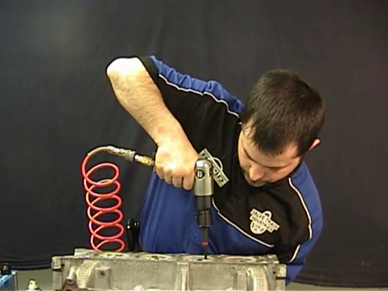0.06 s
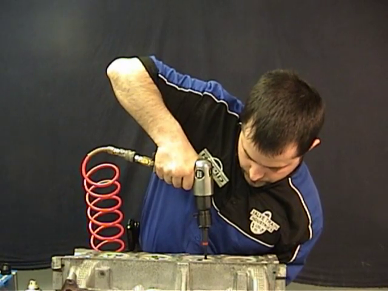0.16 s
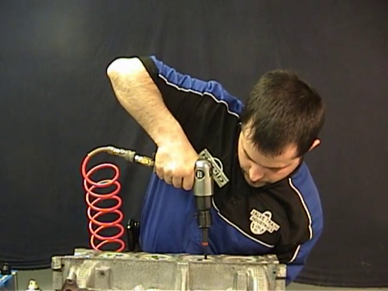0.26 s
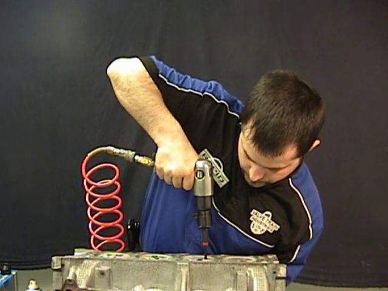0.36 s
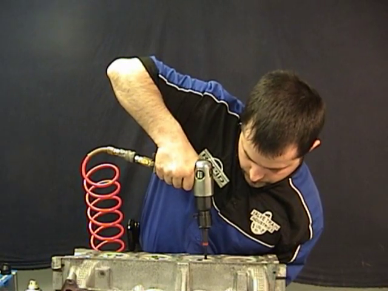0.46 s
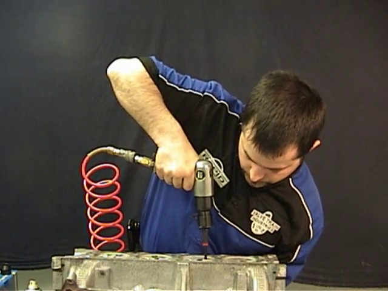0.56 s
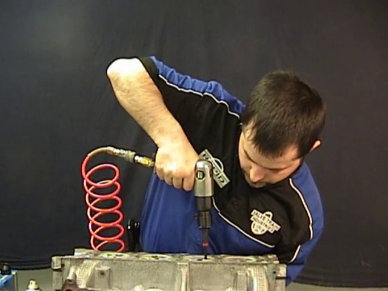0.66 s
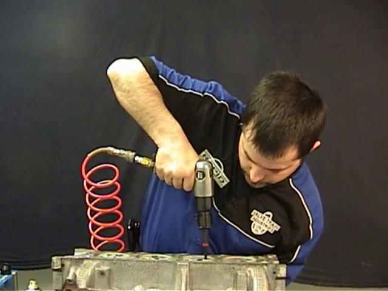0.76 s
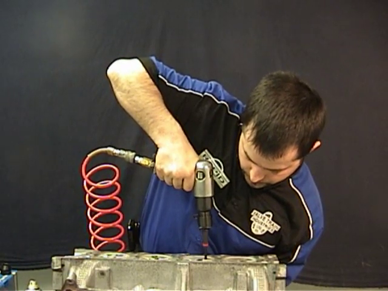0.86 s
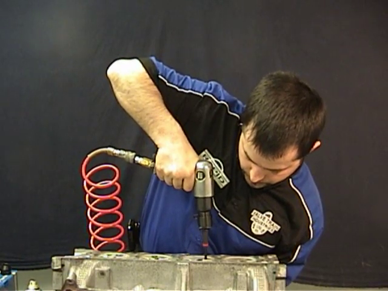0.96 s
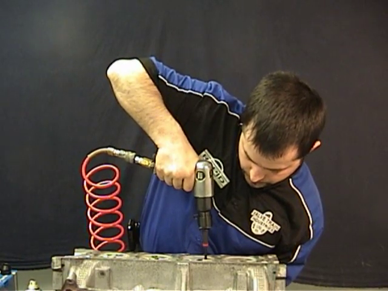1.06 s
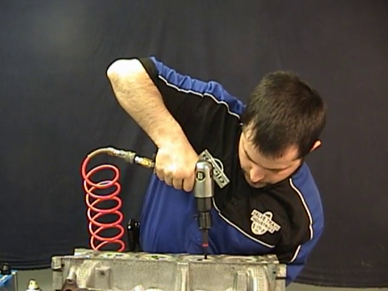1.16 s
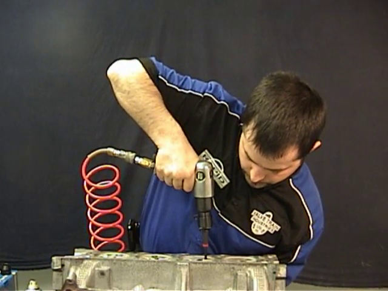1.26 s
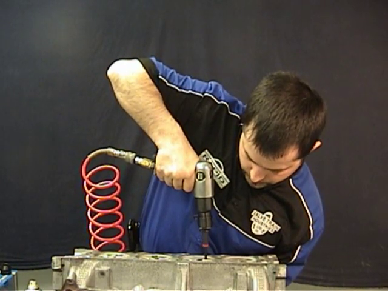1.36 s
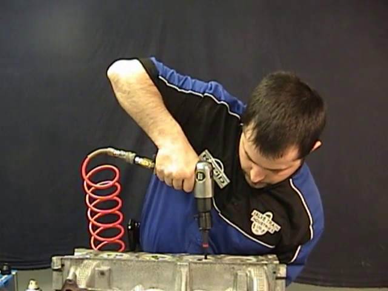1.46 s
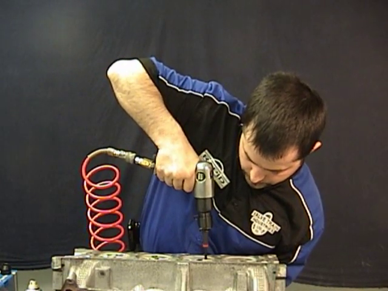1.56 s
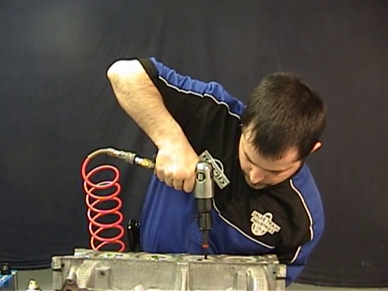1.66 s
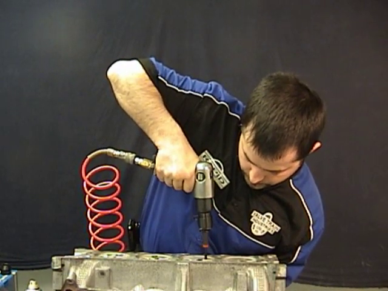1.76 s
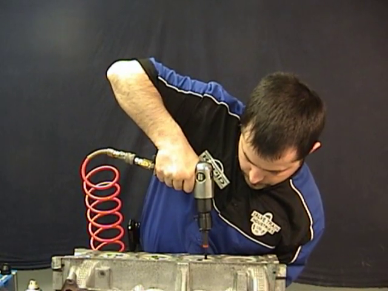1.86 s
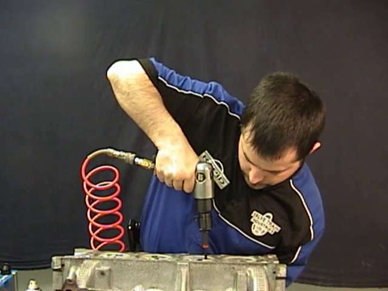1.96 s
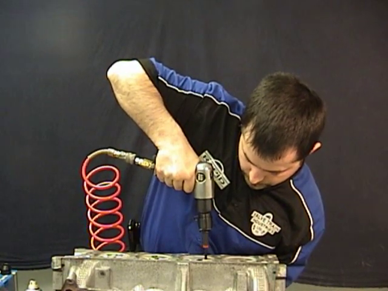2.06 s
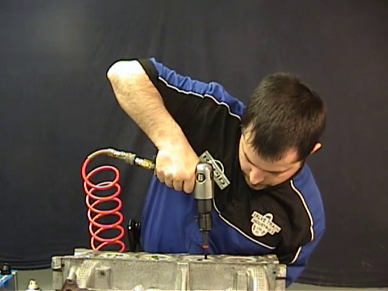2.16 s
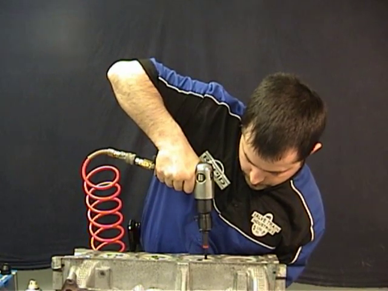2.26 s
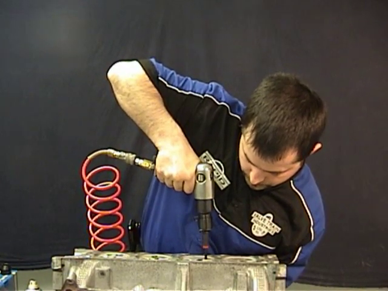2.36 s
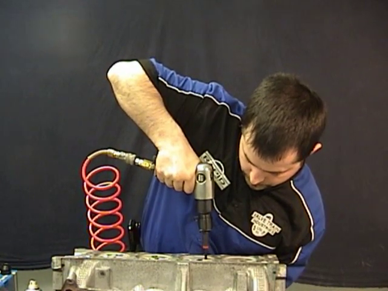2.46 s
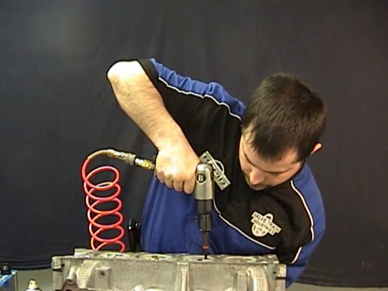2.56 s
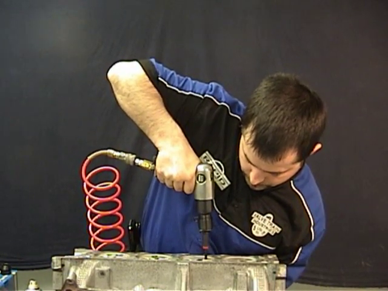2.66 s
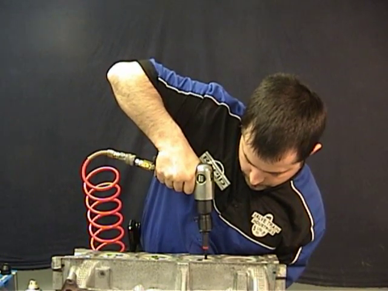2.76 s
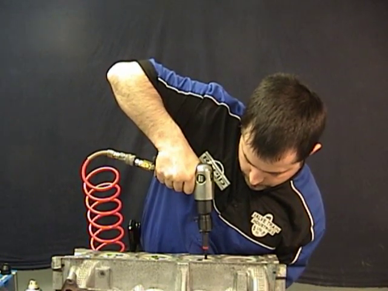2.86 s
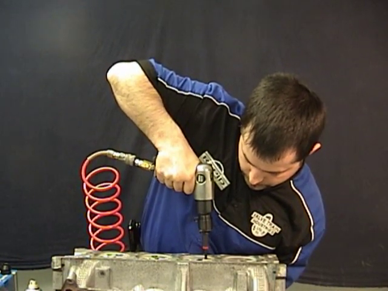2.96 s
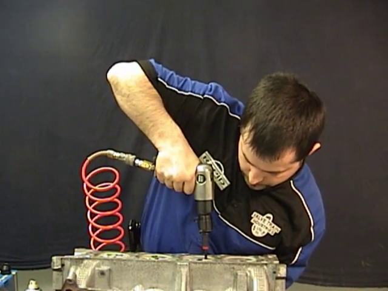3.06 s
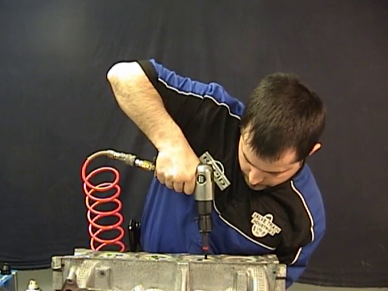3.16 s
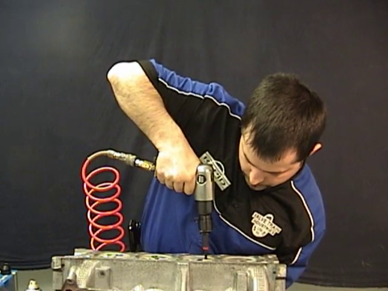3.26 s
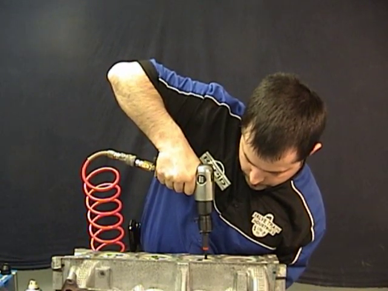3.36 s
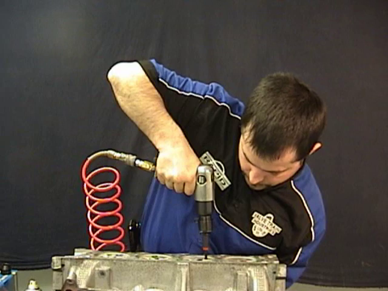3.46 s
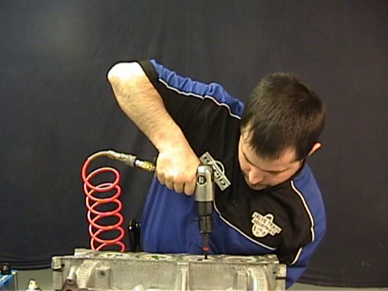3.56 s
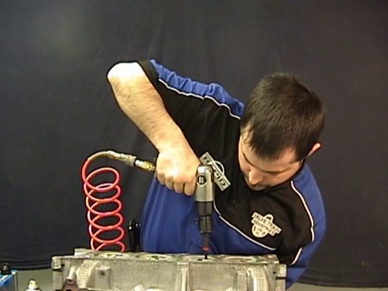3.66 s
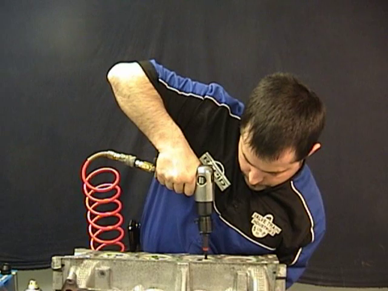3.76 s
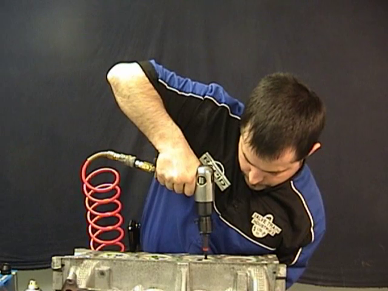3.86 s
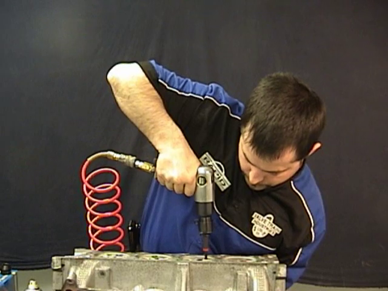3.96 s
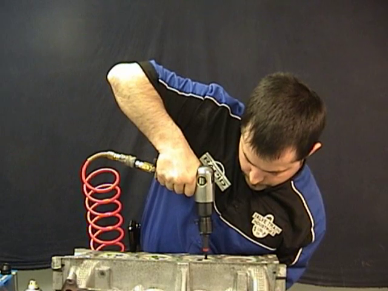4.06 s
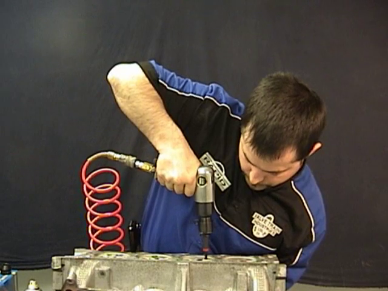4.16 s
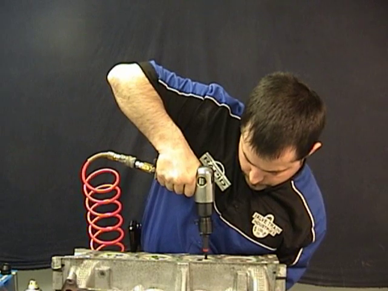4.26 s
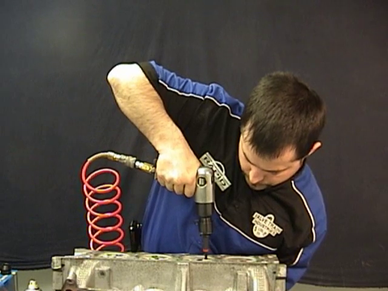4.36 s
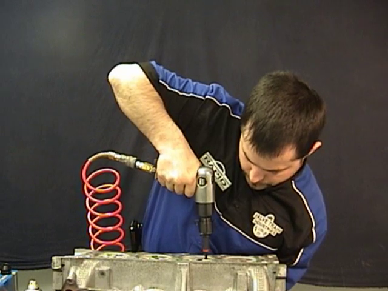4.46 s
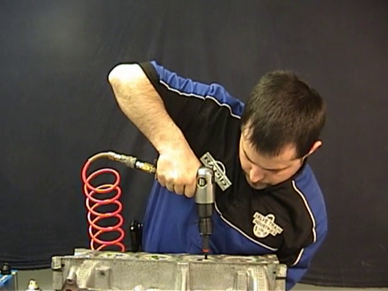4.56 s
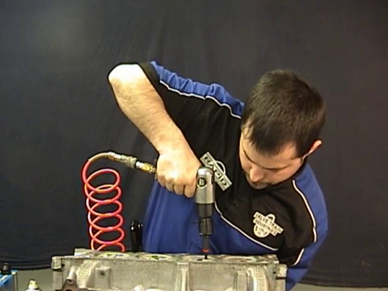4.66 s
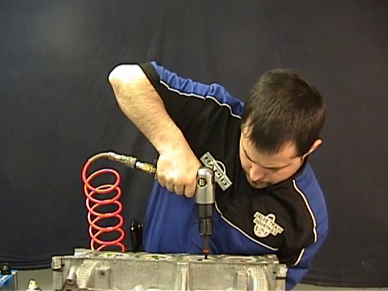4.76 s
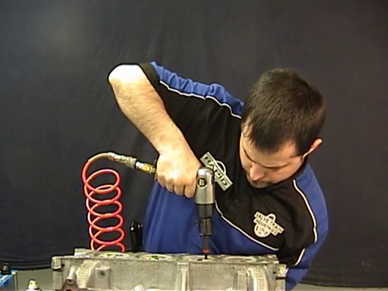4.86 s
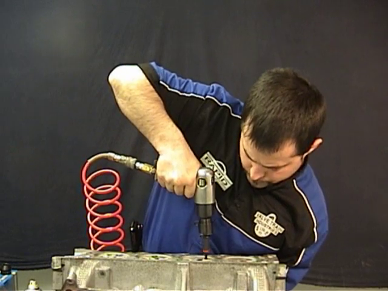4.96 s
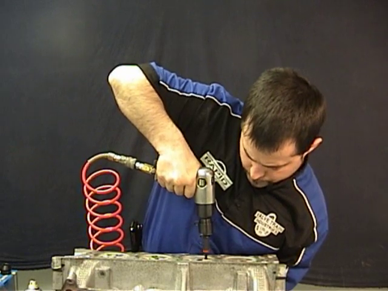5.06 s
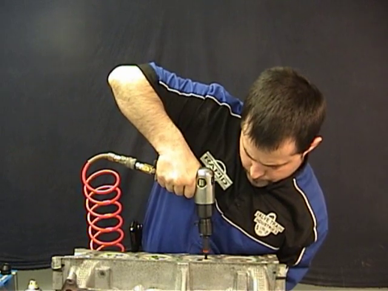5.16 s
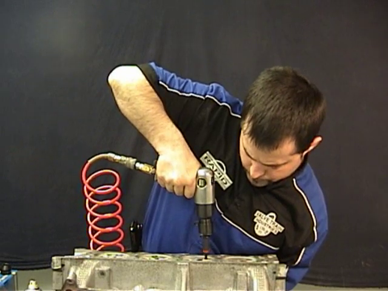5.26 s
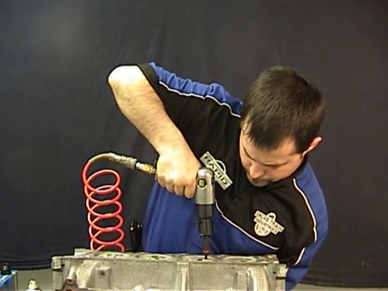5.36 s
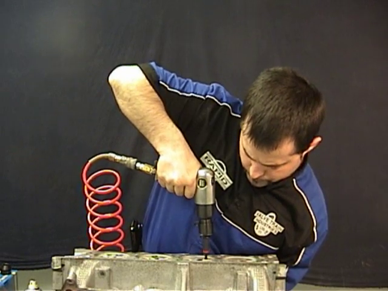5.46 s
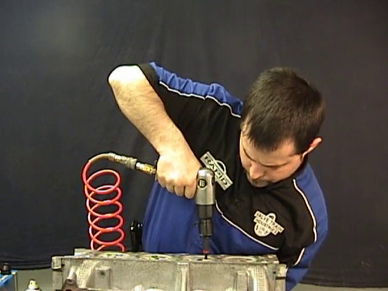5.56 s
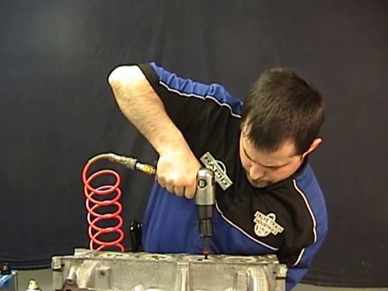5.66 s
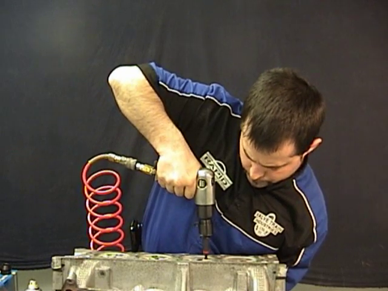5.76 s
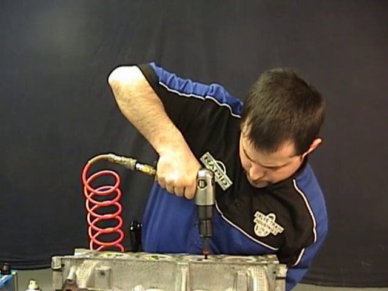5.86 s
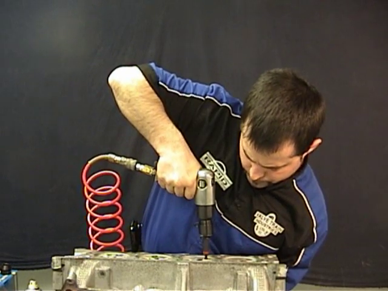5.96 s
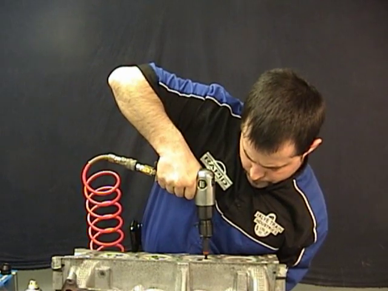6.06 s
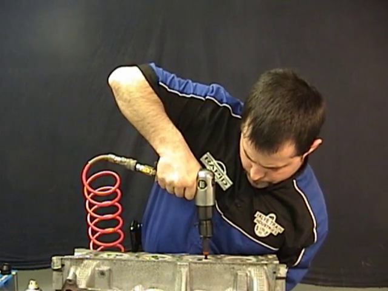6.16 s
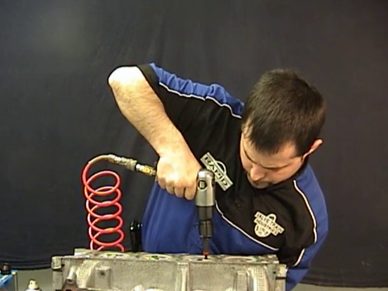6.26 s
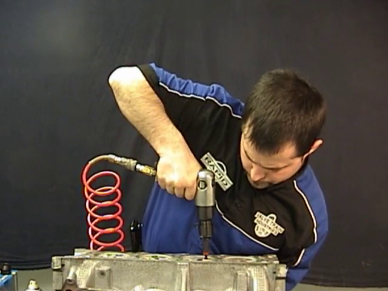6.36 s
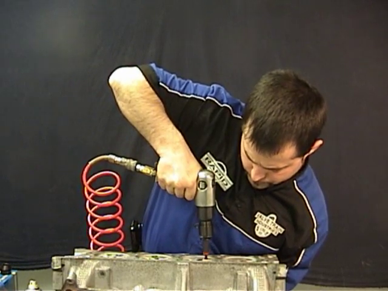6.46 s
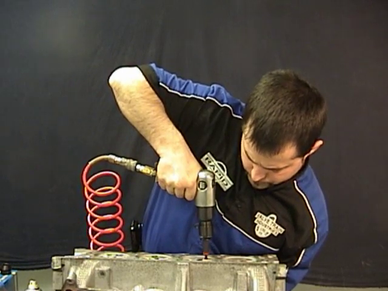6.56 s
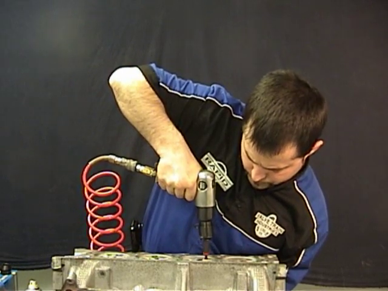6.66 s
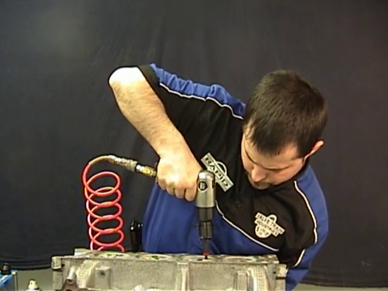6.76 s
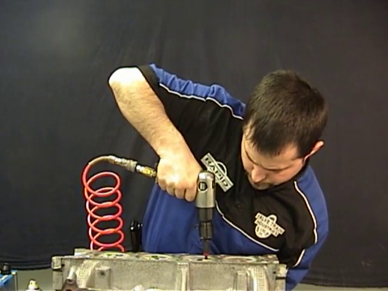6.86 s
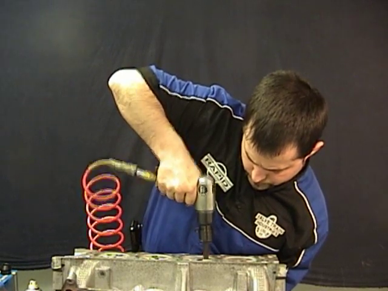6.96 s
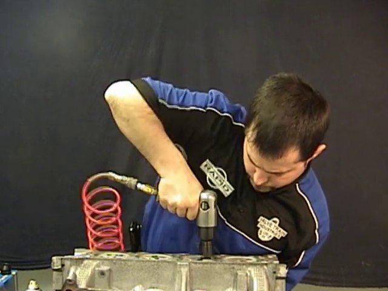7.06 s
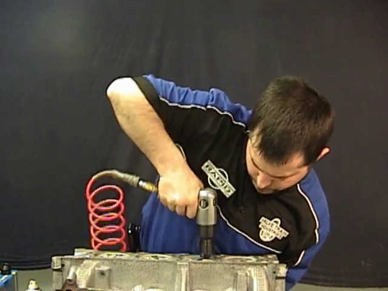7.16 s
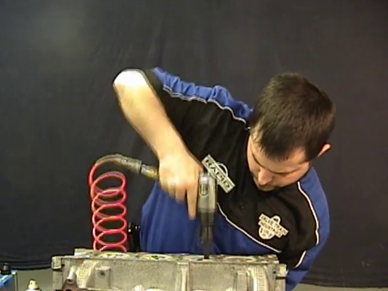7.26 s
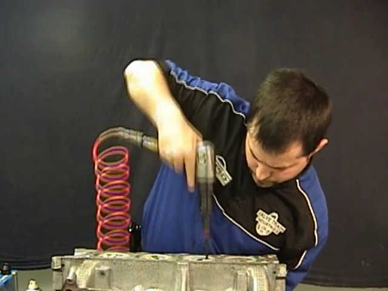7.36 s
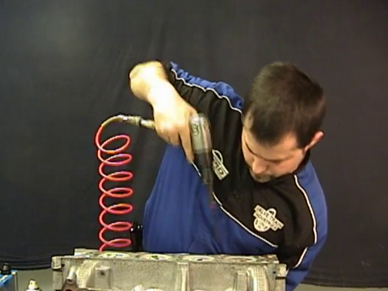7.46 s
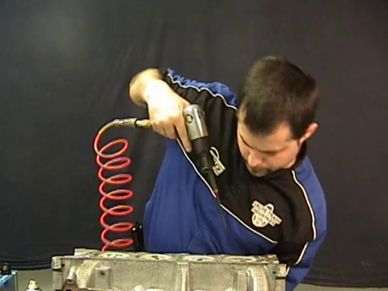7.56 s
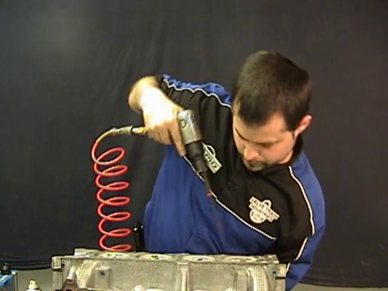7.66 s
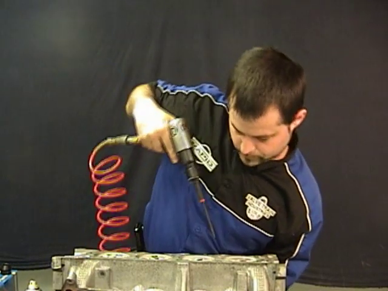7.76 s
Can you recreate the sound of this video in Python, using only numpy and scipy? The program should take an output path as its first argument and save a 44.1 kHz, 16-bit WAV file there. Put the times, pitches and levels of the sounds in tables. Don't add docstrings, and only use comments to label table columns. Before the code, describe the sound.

Harsh, fast pneumatic hammering of a steel bit on metal runs steadily in a workshop, slows abruptly near the end, and stops with clicks.

```python
import sys
import numpy as np
from scipy import signal
from scipy.fft import rfft, irfft
from scipy.io import wavfile
from scipy.ndimage import uniform_filter1d

SR = 44100
rng = np.random.default_rng(int(sys.argv[2]) if len(sys.argv) > 2 else 0)


def dump(signal):
    limited = np.clip(np.atleast_2d(signal).T, -1, 1)
    pcm = np.round(limited * 32767).astype(np.int16)
    wavfile.write(sys.argv[1], SR, pcm)


def amplitude_ratio(level_db):
    exponent = np.asarray(level_db, float) / 20
    return 10 ** exponent


N = 344852
PRE = 20000
M = N + PRE
T = (np.arange(M) - PRE) / SR
RELEASE_S = 7.04
RING_DB = -3
PUFF_DB = -29

# (delay [ms], pressure ratio, width [ms], left over right [dB])
ECHOES = [(-.59, -.34, .6, 2.6), (.47, 1, .25, -1.4), (2.75, -.2, .6, -3.6), (3.51, -.63, .25, 3),
          (4.78, -1.09, .25, -2.8), (5.84, -.41, .25, -1.3), (7.48, .7, .25, .3), (8.2, -.24, .6, 0),
          (10.72, -.34, .6, -1.2), (12.25, .32, .25, -4.8), (14.11, -.21, .6, 4.3),
          (14.77, -.58, .25, -2.7), (17.03, -.38, .25, 1.3), (18.85, .29, .6, -1.4)]


def evened(x):
    return x / np.sqrt(np.mean(x ** 2) + 1e-20)


def read(points, hz):
    f, value = np.transpose(points)
    return np.interp(np.log(hz + 1), np.log(f + 1), value)


def colour(x, points):
    size = x.shape[-1]
    gain = amplitude_ratio(read(points, np.fft.rfftfreq(size, 1 / SR)))
    return irfft(rfft(x) * gain, size)


def train(s, size):
    out = np.zeros(M)
    place = np.round(s * SR).astype(int) + PRE
    np.add.at(out, np.clip(place, 0, M - 1), size)
    return out


def sides(db):
    return amplitude_ratio(np.array([[db / 2], [-db / 2]]))


def ring(blows, hz, width, rise_hz=260):
    r, turn = np.exp(-np.pi * width / SR), 2 * np.pi * hz / SR
    free = signal.lfilter([0, r * np.sin(turn)], [1, -2 * r * np.cos(turn), r * r], blows)
    free = free * np.sqrt(2 * SR * (1 - r * r) / 45)
    return signal.lfilter(*signal.iirpeak(hz, hz / max(rise_hz, 2 * width), fs=SR), free)


def drift(s, size):
    return evened(uniform_filter1d(rng.standard_normal(len(s)), size))


def room_tone():
    # (frequency [Hz], level [dB])
    hiss_colour = [(20, 10), (33, -8), (60, -8), (130, -10), (200, -8), (418, -12), (900, -16), (1140, -22),
                   (2230, -23), (2950, -19), (4200, -24), (6000, -27), (8000, -21), (15700, -34)]
    # (frequency [Hz], level [dB])
    hum = [(199.2, -59), (597.5, -67), (2697, -67), (2998, -63), (3295, -71), (3596, -72), (5620, -72)]
    both, left, right = colour(rng.standard_normal((3, M)), hiss_colour)
    hiss = amplitude_ratio(-50) * evened(np.array([both + .4 * left, both + 0.78 * right]))
    waver = evened(uniform_filter1d(rng.standard_normal(M), 3000))
    return hiss + sum(amplitude_ratio(db + 3 + 2 * waver) * np.sin(2 * np.pi * hz * T) for hz, db in hum)


def strokes(jitter_ms, wander_ms):
    # (time [s], rate [strokes/s])
    pace = [(.0405, 45.595), (.5888, 45.306), (1.1406, 45.243), (1.9142, 45.065), (2.5799, 45.235),
            (2.9115, 44.956), (3.4676, 45.122), (4.4649, 44.897), (4.799, 44.518), (5.5852, 44.696),
            (6.2564, 44.897), (6.5905, 44.709)]
    # (time [s], strength [dB], crack over that [dB])
    last = [
        (7.059, 0, -5),
        (7.0851, -2.5, -3),
        (7.109, -2.5, -2),
        (7.132, -1, -2.5),
        (7.157, -2.5, 1.5),
        (7.181, -3, -2),
        (7.2076, 0, -3),
        (7.2333, -2.5, -4),
        (7.2609, -3.5, -0.5),
        (7.2918, -4.5, -5),
    ]
    s, rate = np.transpose(pace)
    edges, rate = np.r_[s[0] - .5, s, RELEASE_S], np.r_[rate[0], rate]
    count = np.r_[0, np.cumsum(np.diff(edges) * rate)] - rate[0] / 2
    k = np.arange(np.ceil(count[0]) + 1, count[-1])
    uneven_ms = jitter_ms * rng.standard_normal(len(k)) + wander_ms * drift(k, size=6)
    steady = np.interp(k, count, edges) + uneven_ms / 1000
    last_s, last_db, crack_db = np.transpose(last)
    return np.r_[steady, last_s], np.r_[0 * k, last_db], np.r_[0 * k, last_db + crack_db]


def hand(s):
    # (time [s], level [dB])
    force = [(0.0, -18.5), (0.43, -18.5), (1.16, -18), (1.31, -20), (1.53, -17.5), (1.68, -17.5),
             (3.27, -17), (3.35, -18.5), (3.48, -17.5), (3.6, -20.5), (3.79, -18), (5.55, -17.5),
             (5.77, -17), (5.81, -17.5), (6.68, -17.5), (6.95, -19.5)]
    return np.interp(s, *np.transpose(force))


def rebound(s):
    # (start [s], length [s], strength [dB])
    runs = [(0.21, 0.13, -4), (1.22, 0.09, 1), (1.39, 0.05, 2), (1.49, 0.05, 2.8), (2.1, 0.07, 1),
            (2.44, 0.05, 1), (2.97, 0.07, 2), (3.12, 0.09, -2), (3.44, 0.05, 2), (3.55, 0.11, 2),
            (3.9, 0.05, 8), (4.48, 0.09, 1), (4.61, 0.16, 2), (4.81, 0.16, 2), (5.08, 0.18, 1.5),
            (5.3, 0.27, 1), (5.62, 0.2, -0.5), (5.93, 0.34, 1), (6.34, 0.09, 1), (6.51, 0.58, 0),
            (7.15, 0.06, 2)]
    quiet_db, hard_db = -25, -4.5
    db = np.full(len(s), float(quiet_db))
    for start, length, over_db in runs:
        db[(s > start) & (s < start + length)] = hard_db + over_db
    return db


def doublet(ms):
    u = np.arange(-150, 150) / SR / (ms / 1000)
    return -u * np.exp(.5 - u ** 2 / 2)


def exhaust(s, db):
    luck = rng.standard_normal((len(s), 3))
    size = amplitude_ratio(db + PUFF_DB + .6 * drift(s, size=5) + 8.3 + .8 * luck[:, 0])
    out = np.zeros((2, M))
    for ms, ratio, width, pan_db in ECHOES:
        scatter = amplitude_ratio(2.2 * rng.standard_normal(len(s)))
        puffs = train(s + ms / 1000, size * scatter)
        out += ratio * sides(pan_db) * signal.oaconvolve(puffs, doublet(width), "same")
    thud = size * amplitude_ratio(np.minimum(rebound(s) + 2.0 * luck[:, 1], 2))
    thuds = train(s - .0014, thud) + train(s - .0034 + 0.0001 * luck[:, 2], .3 * thud)
    out += signal.oaconvolve(thuds, doublet(.42), "same")
    muffler = signal.butter(4, 1400, fs=SR, output="sos")
    return signal.sosfiltfilt(muffler, out)


def bench(s, db):
    # (frequency [Hz], width [Hz], level [dB], delay [ms])
    modes = [(269.2, 7.5, -38.5, 0.11), (312.6, 15, -73, 1.5), (1010, 9.3, -44, 0.15), (682, 43, -46, 2.84),
             (1140, 62, -42, 0.77), (1260, 27, -36.5, 2.09)]
    size = amplitude_ratio(db + PUFF_DB + 19.5)
    return sum(amplitude_ratio(mode_db) * ring(train(s + ms / 1000, size), hz, width) for hz, width, mode_db, ms in modes)


def crack(s, db):
    # (frequency [Hz], level [dB])
    crack_colour = [(1000, -40), (1500, -21), (2300, 0), (4000, 14), (6000, 22), (9000, 17), (12000, 11.5),
                    (15000, 5)]
    jet_colour = [(60, -22), (300, -8), (1100, -8), (1500, -3),
                  (1700, 1), (2200, -15.5), (5000, -6), (10000, 0.5), (15500, -27.5)]
    # (frequency [Hz], level [dB])
    ear_difference = [(500, 4.5), (2000, -0.5), (6000, -17), (7500, -6), (10000, -4), (11500, -33)]
    t = np.arange(3000) / SR
    luck = rng.standard_normal(len(s))
    blows = train(s + 0.0005, amplitude_ratio(db - 29.5 + .5 * drift(s, size=4) + 0.5 * luck))
    burst = signal.oaconvolve(blows, amplitude_ratio(-60 * t / .015) * np.minimum(t / .0005, 1))[:M]
    blowing = signal.oaconvolve(blows, amplitude_ratio(-60 * t / 0.1) * np.minimum(t / 0.0015, 1))[:M]
    hard, soft = rng.standard_normal((2, 2, M))
    snap = amplitude_ratio(14) * burst * evened(colour(hard, crack_colour))
    air = amplitude_ratio(-.5) * blowing * evened(colour(soft, jet_colour))
    both, apart = snap + air
    tick = signal.oaconvolve(blows, amplitude_ratio(7.5 - 60 * t / 0.0027))[:M]
    both = both + tick * evened(ring(hard[0], 12400, 510))
    return both + colour(apart, ear_difference) * np.array([[1], [-1]])


def block(s, db, scatter_db, wander_db):
    # (frequency [Hz], level [dB], drift as the bit
    # sinks [dB], left over right [dB])
    strong_modes = [(1408, -43, -3.3, -.6), (1449, -32, -5.5, -4.3), (1933, -44.5, 1.5, -3.5),
                    (2507, -38.4, -1.3, -1), (2959, -27.6, -2.7, 2.4), (3200, -29, -.2, -1.5),
                    (3429, -36.9, -10.1, 4.2), (3650, -49.9, 2, .1), (3961, -37.3, -9.7, .3),
                    (4302, -33.7, -3.1, .3), (4580, -41.6, .3, -.6), (5058, -34.6, .9, -1),
                    (5302, -30.3, .9, .2), (5530, -39.2, 1, .9),
                    (6013, -37.6, 1.2, 2.1), (6312, -36.8, -8.2, 2.3), (6842, -38.5, 4.5, 2.6),
                    (7017, -39.1, 3.3, .7), (7386, -45.8, 9.9, -.3), (8988, -41.4, 0, 3.5),
                    (9380, -44.4, 10.4, .1), (9720, -40.8, 13.2, 3.8), (10300, -50.5, 11.9, .2),
                    (10917, -43.6, -3.2, -1.6), (11086, -47.9, -5.2, 0), (12009, -48.7, .7, 0),
                 (12290, -48.9, 2.3, 0), (12615, -49.8, .6, 0), (14386, -52.5, -6.9, -.2),
                 (14905, -48, -13.1, .1)]
    # (frequency [Hz], middle [s], half length [s], level [dB])
    spells = [
        (1933, 5.0, .35, 8),
        (10917, 3.2, 1.0, 6),
        (9720, 5.6, 1.0, 4),
        (6013, 3.9, .8, 5),
        (7017, 5.4, .9, 4),
        (7017, 3.1, .3, 5),
        (5302, 3.6, 2.5, 3),
        (5058, 4, 3, 2),
        (3961, 4.2, 1.5, -3),
    ]
    # (frequency [Hz], width [Hz], level [dB])
    free_modes = [(185, 17, -52.5), (347, 71, -32), (908, 48, -32.5), (1440, 2.2, -48), (1933, 1.8, -48),
                  (2490, 4.6, -47), (3150, 1.3, -64), (3770, 10, -43), (4320, 30, -40), (5370, 41, -34),
                  (5620, 23, -32), (5740, 60, -35), (6180, 8.3, -36.5), (8530, 230, -37), (11800, 710, -48)]
    out = np.zeros((2, M))
    modes = strong_modes
    luck = rng.standard_normal((len(s), 2 * len(modes)))
    slow = evened(uniform_filter1d(luck[:, len(modes):], 15, 0))
    ring_db = hand(s) + RING_DB
    bend_db = hand(s) - 8.5 + 1.2 * drift(s, size=4)
    pressing = np.clip((RELEASE_S - s) / 0.11, 0, 1)
    for k, (hz, mode_db, drift_db, pan_db) in enumerate(modes):
        level_db = bend_db + 27.5 if hz < 1600 else ring_db + 21
        for f, mid, half, up_db in spells:
            if abs(f / hz - 1) < .004:
                level_db = level_db + up_db * np.exp(-((s - mid) / half) ** 2)
        level_db = level_db + mode_db + drift_db * (s / 6 - 0.72)
        size = amplitude_ratio(level_db + scatter_db * luck[:, k] + wander_db * slow[:, k])
        extra = .3 if hz < 1600 else .5 if 5000 < hz < 5400 else 0
        width = 10 * (.45 + hz / 8000 + extra)
        out += ring(train(s + .0007, pressing * size), hz, width) * sides(pan_db)
    luck = rng.standard_normal((len(s), len(free_modes)))
    for k, (hz, width, mode_db) in enumerate(free_modes):
        size = (1 - pressing) * amplitude_ratio(db + mode_db + 2 * luck[:, k])
        out += ring(train(s + .0007, size), hz, width)
    return out


def crowd(s, db, t60):
    # (frequency [Hz], level [dB])
    crowd_colour = [(1500, 1), (2200, 1), (3000, 11), (4000, 6.5), (5600, 3.5), (8000, 9), (10200, -37),
                    (12000, 12), (15500, 4)]
    t, out = np.arange(SR // 4) / SR, np.zeros((2, M))
    hz, decay = rng.uniform(1480, 15700, (400, 1)), rng.uniform(.5, 1.5, (400, 1))
    fade_s = t60 * decay * (4000 / hz) ** .6
    rings = np.sin(2 * np.pi * hz * t) * amplitude_ratio(read(crowd_colour, hz) - 60 * t / fade_s)
    blend = rng.standard_normal((len(s), 4))
    size = amplitude_ratio(db + hand(s) + RING_DB - 1.0 * (s > RELEASE_S))
    for k in range(4):
        both, left, right = rng.standard_normal((3, 400)) @ rings
        shape = np.array([both + 0.79 * left, both + 0.29 * right])
        blows = train(s + .0007, blend[:, k] * size)
        out += signal.oaconvolve(blows[None], shape / np.linalg.norm(both), axes=1)[:, :M]
    return amplitude_ratio(11.5) * out


def echoes(x):
    return sum(ratio * sides(pan_db) * np.roll(x, round(ms * SR / 1000)) for ms, ratio, _, pan_db in ECHOES[3:])


def shop(x, same):
    # (frequency [Hz], time to fade by 60 dB [s])
    fading = [(100, .5), (500, .4), (2000, .33), (8000, .22), (15000, .15)]
    taps = rng.choice([-1., 1.], (3, SR // 2)) * (rng.random((3, SR // 2)) < .05)
    taps[:, :450] = 0
    hz, t, z = signal.stft(taps[0] * same + taps[1:] * (1 - same), SR, nperseg=256)
    tail = signal.istft(z * amplitude_ratio(-60 * t / read(fading, hz)[:, None]), SR, nperseg=256)[1]
    return signal.oaconvolve(x[None], tail / np.linalg.norm(tail[0]), axes=1)[:, :M]


def clicks():
    # (time [s], peak level [dB], centre [Hz], width [Hz], time to fade by 60 dB [s])
    lifts = [(7.2918, -10, 8760, 1200, 0.0068), (7.3842, -25, 5600, 2500, 0.011),
             (7.3836, -24, 10300, 5000, 0.0059), (7.411, -40, 8650, 7407, 0.051),
             (7.541, -46, 2830, 3704, 0.098), (7.607, -37, 6600, 1296, .015),
             (7.626, -46, 6600, 1320, 0.02), (7.695, -58, 7020, 1190, .01), (7.733, -48, 6900, 1110, .01),
             (7.70, -46, 278, 40, .4), (7.74, -57, 140, 40, 0.35), (7.615, -41, 1640, 200, 0.033)]
    out, t = np.zeros(M), np.arange(8000) / SR
    for s, db, hz, width, t60 in lifts:
        noise = ring(rng.standard_normal(len(t)), hz, min(width, hz / 2))
        part = out[round(s * SR) + PRE:][:len(t)]
        part += (amplitude_ratio(db - 5.5 - 60 * t / t60) * evened(noise))[:len(part)]
    return out


def scene():
    s, db, crack_db = strokes(jitter_ms=.04, wander_ms=.2)
    puff = exhaust(s, db) + bench(s, db)
    s = s + .0001 * rng.standard_normal(len(s))
    hit = crack(s, crack_db) + clicks()
    metal = block(s, db, scatter_db=1.5, wander_db=1.05) + crowd(s, db, t60=0.48)
    near = puff + hit + metal + amplitude_ratio(-8.5) * echoes(hit.mean(0))
    vent_db = np.interp(T, [7.0, 7.1], [-19, -10])
    wet = shop(amplitude_ratio(vent_db) * puff.mean(0) + amplitude_ratio(-10) * (hit + metal).mean(0), same=.7)
    return (near + wet + room_tone())[:, PRE:]


def roll_off(x):
    return signal.sosfilt(signal.butter(12, 16740, fs=SR, output="sos"), x)


def record(dry):
    x = signal.sosfilt(signal.butter(2, 150, "highpass", fs=SR, output="sos"), dry)
    treble_cut = signal.firwin(701, 15700, window=("kaiser", 9), fs=SR)
    x = signal.oaconvolve(x, treble_cut[None], "same", axes=1)
    side = (x[0] - x[1]) / 2
    side = 0.25 * side + signal.sosfiltfilt(signal.butter(8, 10800, fs=SR, output="sos"), side)
    return roll_off(x.mean(0) + np.array([side, -side]))


dry = scene()
out = record(dry)
dump(out)
```